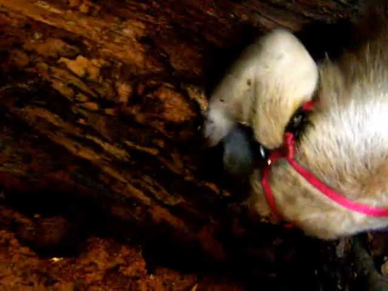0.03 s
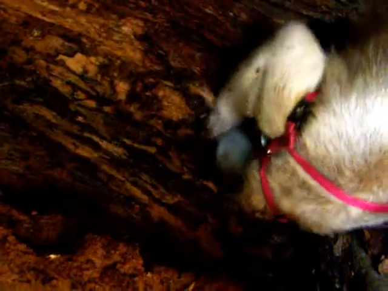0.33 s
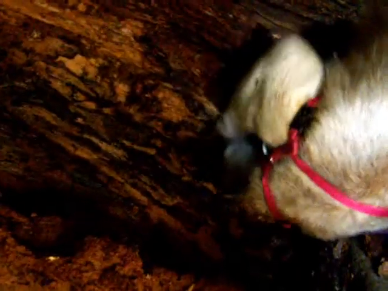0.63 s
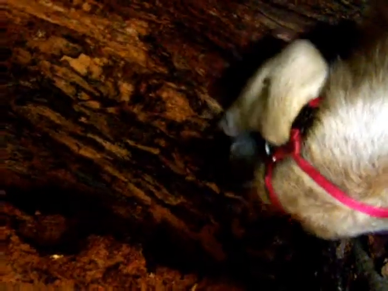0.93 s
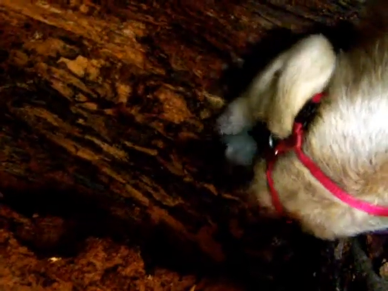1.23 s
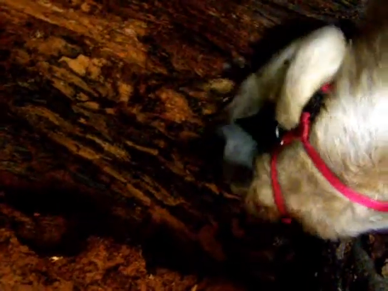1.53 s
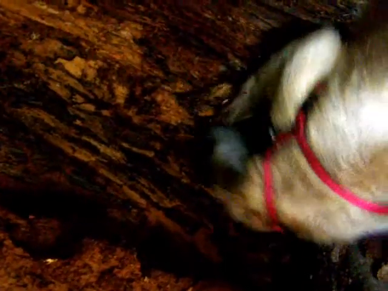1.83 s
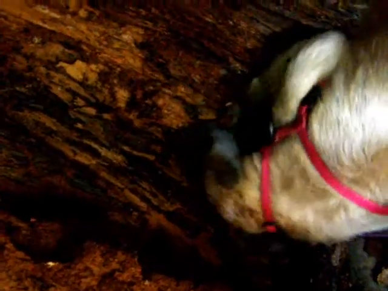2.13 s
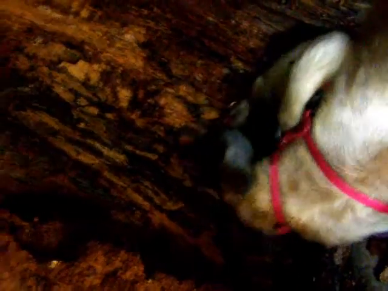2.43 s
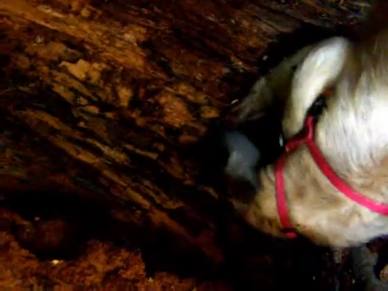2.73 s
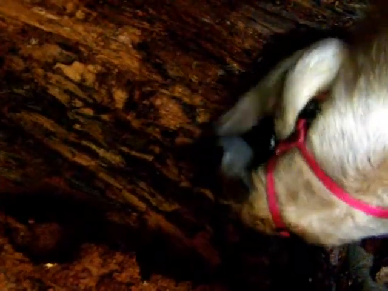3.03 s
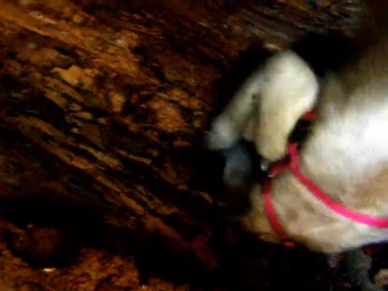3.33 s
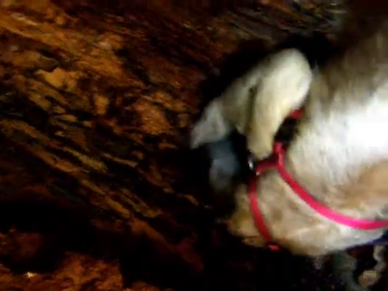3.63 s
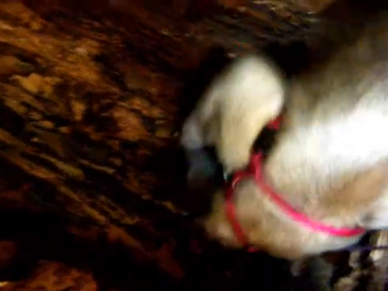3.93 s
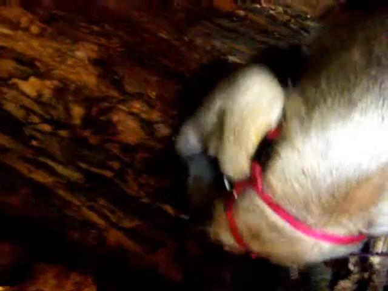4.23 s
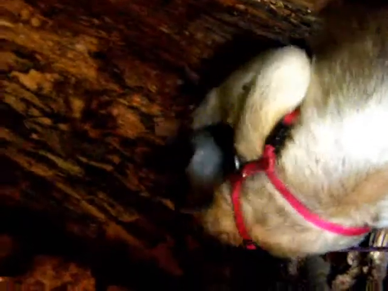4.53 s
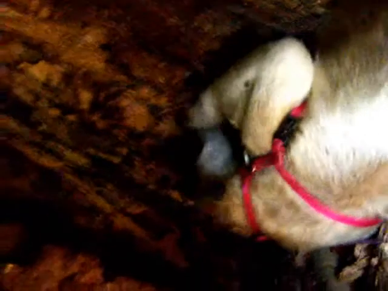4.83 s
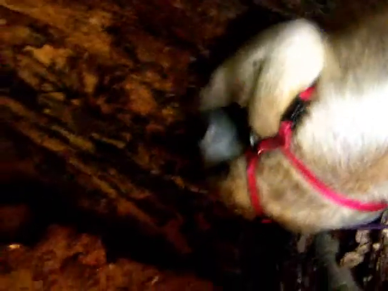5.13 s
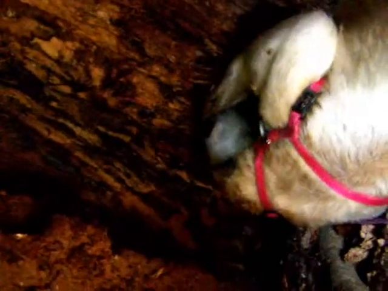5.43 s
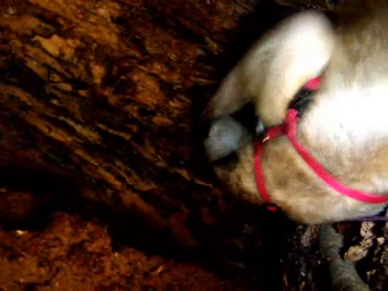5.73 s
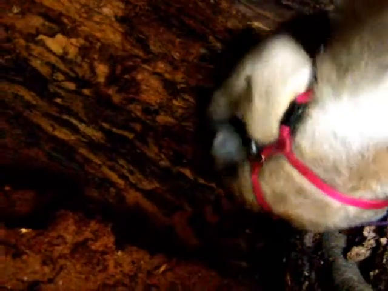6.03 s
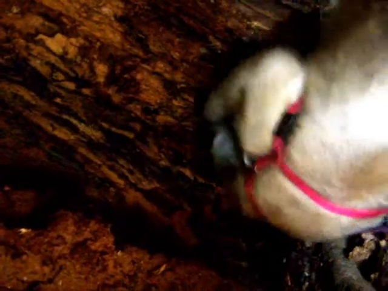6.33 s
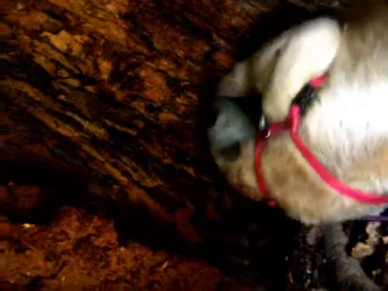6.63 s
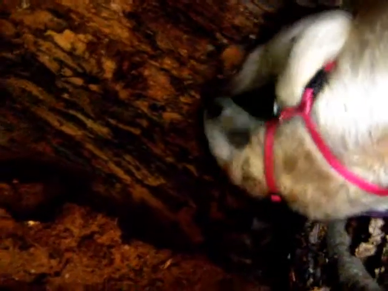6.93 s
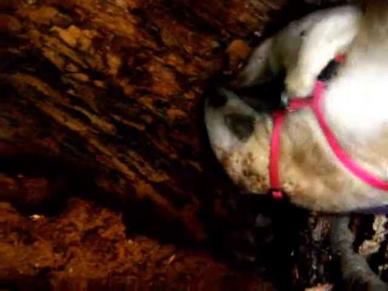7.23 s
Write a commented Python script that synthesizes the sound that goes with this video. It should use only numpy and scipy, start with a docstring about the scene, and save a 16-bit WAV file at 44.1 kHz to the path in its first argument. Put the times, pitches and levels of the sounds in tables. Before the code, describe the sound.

Over a steady, quiet outdoor hiss, a hand-held microphone picks up soft low thumps, a throbbing rumble and gritty little finger scratches. Close by, a goat rubs and nibbles the crumbling inside of a hollow tree. A high squeaky scrape sounds, the audio cuts out for a moment, and the scrape returns. Dry fibres tick and snap in clusters, the muzzle bumps the trunk dully, and the rubbing gradually turns crisper.

```python
"""A goat noses and nibbles at rotten wood inside a hollow tree, close to a hand-held camera's microphone.
Its muzzle rubs the crumbly wall and bumps the trunk, dry fibres snap, and one squeaky scrape is heard
again as an exact repeat. Fingers scratch on the camera; soft knocks set the microphone swaying with a
deep throb. Behind it all lies a quiet outdoor wash. Once the sound drops out briefly."""
import sys
import numpy as np
from scipy import signal
from scipy.fft import rfft, irfft
from scipy.io import wavfile
from scipy.ndimage import uniform_filter1d

SR = 44100
rng = np.random.default_rng(int(sys.argv[2]) if len(sys.argv) > 2 else 0)


def bounce(signal):
    """Save signal as a 16-bit WAV file at the path given by the first command-line argument."""
    frames = np.transpose(np.atleast_2d(signal))
    limited = np.clip(frames, -1, 1)
    pcm = np.round(limited * 32767).astype(np.int16)
    wavfile.write(sys.argv[1], SR, pcm)


N = 321930
TIME = np.arange(N) / SR
CUTOFF_HZ = 8740

# muzzle strokes on the inside wall: t/s, length/s, relative pressure/dB
MUZZLE_RUBS = [(.68, 0.75, -43), (1.223, 0.59, -38.5), (1.525, 0.3, -41.5), (2.215, 0.82, -44),
               (2.898, 0.21, -43.5), (3.763, 0.27, -41.5), (4.768, 0.15, -34.5), (4.845, 0.4, -39),
               (5.666, 0.7, -43), (6.843, 0.48, -43)]
# from damp, hollow wood over to dry, crumbly wood: t/s, dryness (0-1)
WOOD_DRYNESS = [(1.3, 0), (2.9, 0.2), (3.8, 0.73), (4.9, 0.5), (7, .97)]
# spectra of crumbling wood, its dry fizz and its damp grumble: f/Hz, level/dB
CRUMBLE_SPECTRUM = [(150, -30), (550, -10), (850, -22), (1650, -11), (2100, -9.5), (2800, -6.5), (3150, -5),
                    (3400, 4.5), (3650, 2.5), (4000, -6), (4400, -4.5), (4900, -23), (8500, -40.5)]
FIZZ_SPECTRUM = [(3000, -23.5), (4100, 0.5), (4650, 4), (4900, -1.5), (5350, 3), (6200, -7.5), (7600, -10),
                 (8500, -23.5)]
GRUMBLE_SPECTRUM = [(150, -12), (350, -8.5), (550, 7.5), (850, -12.5), (1600, -5), (2400, -13),
                    (4000, -43.5)]


def muzzle_rubbing(rise=0.2, splinter_db=-11, trickle_db=-60):
    """Close to the microphone, crumbs break under the muzzle: dry wood fizzes, damp wood grumbles."""
    pressure = sum(amp(db) * np.interp((TIME - start) / length, [0, rise, 1], [0, 1, 0])
                   for start, length, db in MUZZLE_RUBS)
    dryness = np.interp(TIME, *np.transpose(WOOD_DRYNESS))
    fizz_level = pressure * amp(-15.5 + 11.5 * dryness)
    grumble_level = pressure * amp(-7 - 10.5 * dryness)
    clumps = unit(amp(2 * wander(63)))
    body = colour(pressure * clumps * crumbs(per_s=5000, spread_db=2.5), CRUMBLE_SPECTRUM)
    fizz = colour(fizz_level * clumps * crumbs(per_s=2900, spread_db=1.5), FIZZ_SPECTRUM)
    grumble = colour(grumble_level * crumbs(per_s=1600, spread_db=2.5), GRUMBLE_SPECTRUM)
    splinters = colour(pressure * crumbs(per_s=41, spread_db=0), SCRATCH_SPECTRUM)
    trickle = colour(crumbs(per_s=220, spread_db=-1.5), FIZZ_SPECTRUM)  # runs on between rubs
    return body + fizz + grumble + amp(splinter_db) * splinters + amp(trickle_db) * trickle


# strokes of one squeaky scrape: t/s, length/s, level/dB, roughness (0-1), f/Hz
SQUEAK_STROKES = [(.874, 0.006, -25.5, 0.11, 3500), (.922, .017, -41, .7, 3000),
                  (0.936, 0.0068, -23, .02, 3470), (.94, .064, -33.5, .25, 3490),
                  (1, 0.027, -38.5, .5, 3400), (1.046, 0.057, -39, 0.87, 2860)]
# spectrum of its rasp: f/Hz, level/dB
RASP_SPECTRUM = [(1800, -30.5), (2500, 0.5), (2850, 8.5), (3150, -2), (3500, 18.5), (3850, -3), (4400, -32)]


def squeaky_scrape(repeat_after_s=1.5344):
    """One stick-slip scrape on hard wood, heard again as an exact repeat about 1.5 s later."""
    start, length, db, roughness, hz = np.transpose(SQUEAK_STROKES)
    stroke = np.maximum(np.searchsorted(start, TIME) - 1, 0)  # which one is sounding
    cycles = np.cumsum(hz[stroke] + 70 * wander(320)) / SR
    flutter_db = 8 * np.sqrt(roughness[stroke]) * np.tanh(wander(220))
    whistle = np.sqrt(2) * np.sin(2 * np.pi * cycles) * amp(flutter_db)
    whistle_level = strokes(zip(start, length, db + 10 * np.log10(1 - roughness)), taper=0.35)
    rasp_level = strokes(zip(start, length, db + 10 * np.log10(roughness)), taper=0.35)
    rasp = colour(rasp_level * rng.standard_normal(N), RASP_SPECTRUM)
    scrape = whistle_level * whistle + rasp
    return scrape + np.roll(scrape, round(repeat_after_s * SR))


# the loudest breaking fibres: t/s, relative level/dB, f/Hz, brightness/dB
FIBRE_SNAPS = [(0.424, -36, 2590, -22), (1.401, -32, 3420, -12), (1.5708, -25, 3630, -11),
               (1.579, -34, 3560, -2), (1.5863, -25.5, 3400, -13), (1.634, -28, 3540, -10),
               (2.08, -36, 3450, -4), (2.8466, -29, 3460, -11), (2.865, -32.5, 3400, -14),
               (2.9445, -31.5, 3720, -8), (2.9743, -31, 3570, -13), (3.039, -28, 3350, -13),
               (3.127, -33.5, 3450, -9), (3.1556, -37, 3550, -5), (3.64, -31.5, 3400, -11),
               (3.6662, -26.3, 3540, -19), (3.7908, -29.5, 3380, -11), (3.8894, -31.5, 3350, -10),
               (3.8977, -33, 3620, -8), (4.0567, -35, 3650, -5), (5.3322, -24, 4100, -20),
               (5.3341, -20.5, 3850, -9.5), (5.4324, -32, 3420, -10.5), (5.445, -33, 3700, -8),
               (6.036, -32.5, 3300, -13), (6.3213, -33, 2480, -17), (6.7113, -33.5, 2220, -23)]
# ring of the wood, shifted to each snap's pitch: f/Hz, level/dB
RING_SPECTRUM = [(500, -18), (1800, -15), (3050, -7.5), (3400, 1.5), (3800, -5), (4300, -16), (5500, -21.5),
                 (8500, -40.5)]


def fibre_snapping(gain_db=18, edge_db=-5, tear_s=0.0024):
    """A fibre breaks with one click, tears on briefly and rings the wood at its own pitch."""
    t, out = np.arange(SR // 30) / SR, np.zeros(N)
    tearing = amp(-17) * np.exp(-t / tear_s)
    f = np.geomspace(300, CUTOFF_HZ, 100)
    peak_hz = max(RING_SPECTRUM, key=lambda point: point[1])[0]
    for start, db, hz, bright_db in FIBRE_SNAPS:
        crack = (t == 0) + tearing * rng.standard_normal(len(t))
        ring_db = level_at(RING_SPECTRUM, f * peak_hz / hz)
        fizz_db = level_at(FIZZ_SPECTRUM, f) + bright_db + edge_db  # dry fibres break brighter
        spectrum = np.c_[f, np.maximum(ring_db, fizz_db)]
        add(out, start, amp(db + gain_db) * colour(crack, spectrum))
    return out


# dull bumps on the trunk: t/s, relative level/dB
MUZZLE_BUMPS = [(.873, -27.5), (1.012, -29.5), (2.408, -29), (2.546, -30), (2.944, -33), (3.039, -30.5),
                (3.126, -32.5)]
# the hollow trunk's response: f/Hz, level/dB
TRUNK_SPECTRUM = [(90, -22), (180, -6), (330, -2), (550, -2.5), (800, -17.5), (1500, -20.5), (3000, -49)]


def muzzle_bumping(gain_db=16, decay_s=0.01):
    """A soft blow and a brief shudder, dying quickly in the damp trunk."""
    t, out = np.arange(SR // 10) / SR, np.zeros(N)
    for start, db in MUZZLE_BUMPS:
        shudder = amp(-22) * rng.standard_normal(len(t)) * np.exp(-t / decay_s)
        add(out, start, amp(db + gain_db) * ((t == 0) + shudder))
    return colour(out, TRUNK_SPECTRUM)


# fingers on the camera: t/s, length/s, relative level/dB
HANDLING_SCRATCHES = [(1.685, 0.046, -42.5), (1.992, 0.019, -42), (2.85, 0.022, -43), (3.128, 0.026, -47),
                      (4.275, 0.026, -42.5), (4.505, .028, -45.5), (4.67, .032, -45), (5.362, 0.014, -38.5),
                      (6.28, 0.042, -41), (6.392, .037, -40.5), (6.508, 0.041, -40.5), (6.626, .072, -41),
                      (7.153, 0.039, -37)]
# spectrum of these scratches, also used for the wood's splinters: f/Hz, level/dB
SCRATCH_SPECTRUM = [(500, -10), (1600, -24), (2600, -1), (3050, -9.5), (3500, 5), (4200, -4.5),
                    (5300, -7.5), (6300, -15), (8500, -35)]


def handling_scratching(gain_db=5):
    """Fingers rub the camera in short, gritty scratches, many just before a knock."""
    grit = crumbs(per_s=3500, spread_db=2.5) * unit(amp(1.7 * wander(200)))
    return amp(gain_db) * colour(strokes(HANDLING_SCRATCHES, taper=0.64) * grit, SCRATCH_SPECTRUM)


# knocks on the camera, alone or in even runs: first t/s, count, gap/s, sway level/dB, thump level/dB
CAMERA_KNOCKS = [(0, 2, .048, -32, -27), (.17, 3, .1205, -26, -26.5), (.543, 2, .04, -25.5, -33),
                 (.788, 1, 0, -27.5, -35), (1.114, 1, 0, -27, -33.5), (1.673, 1, 0, -25, -22),
                 (1.884, 2, .115, -26.5, -26), (2.117, 2, .206, -27, -35), (2.647, 1, 0, -26.5, -32),
                 (2.959, 4, .135, -25, -26.5), (3.656, 1, 0, -27, -23), (3.831, 3, .112, -29, -27.5),
                 (4.178, 3, .112, -29.5, -27), (4.528, 1, 0, -27.5, -24.5), (5.146, 1, 0, -28, -23.5),
                 (5.401, 2, .128, -30.5, -37.5), (5.886, 2, .131, -32, -26), (6.189, 4, .114, -29.5, -26.5),
                 (6.905, 1, 0, -29.5, -24.5), (7.056, 3, .118, -30, -25.5)]
# modes of the microphone and of the case: f/Hz, level/dB, t60/s
SWAY_MODE = (26.56, 0, 1.2)
CASE_MODES = [(51.3, 5.5, 0.013), (74.4, -15, 0.17), (91.9, -13, 0.27)]


def camera_knocking(lowpass_hz=150):
    """Each knock thumps the case and leaves the microphone swaying; knocks in step build the sway up."""
    t, out = np.arange(2 * SR) / SR, np.zeros(N)
    sway, *case = [amp(db - 60 * t / t60) * np.sin(2 * np.pi * hz * t)
                   for hz, db, t60 in [SWAY_MODE] + CASE_MODES]
    for first, count, gap, sway_db, thump_db in CAMERA_KNOCKS:
        for start in first + gap * np.arange(count):
            add(out, start, amp(thump_db) * sum(case) - amp(sway_db) * sway)
    return signal.sosfiltfilt(signal.butter(2, lowpass_hz, fs=SR, output="sos"), out)


# outdoor ambience at the tree: f/Hz, level/dB
WASH_SPECTRUM = [(20, 0), (60, -1.5), (130, -5.5), (250, -6.5), (380, -0.5), (530, 3.5), (700, 0.5),
                 (850, -3), (1150, 0), (1550, -4.5), (2050, -4), (2300, -7.5), (3050, -7.5), (3550, -1.5),
                 (4000, -9.5), (4400, -10), (4900, -18), (5500, -21.5), (6300, -26), (7500, -28.5),
                 (8500, -39.5)]


def outdoor_wash(level_db=-40.5):
    """The steady background, coloured by the hollow and wavering by about 1 dB."""
    return amp(level_db + wander(30)) * colour(rng.standard_normal(N), WASH_SPECTRUM)


def amp(db):
    """Decibels to gain."""
    return 10 ** (np.asarray(db) / 20)


def unit(x):
    """Scales to an rms of 1."""
    return x / np.sqrt(np.mean(x ** 2) + 1e-20)


def add(mix, start_s, sound):
    """Mixes a sound in at the given time."""
    part = mix[round(start_s * SR):][:len(sound)]
    part += sound[:len(part)]


def level_at(spectrum, hz):
    """A spectrum's dB at the given frequencies."""
    f, db = np.transpose(spectrum)
    return np.interp(np.log(hz + 1), np.log(f), db)


def colour(x, spectrum):
    """Minimum-phase filter of unit energy with the given spectral shape."""
    hz = abs(np.fft.fftfreq(4096, 1 / SR))
    log_gain = np.log(amp(level_at(spectrum, hz)))
    response = np.exp(np.conj(signal.hilbert(log_gain)))
    taps = np.fft.ifft(response).real[:len(hz) // 2]
    return signal.fftconvolve(x, taps / np.linalg.norm(taps))[:len(x)]


def wander(rate_hz):
    """Smooth random drift of rms 1, moving up to about the given rate."""
    f = np.fft.rfftfreq(N, 1 / SR)
    return unit(irfft(rfft(rng.standard_normal(N)) * np.exp(-(f / rate_hz) ** 2), N))


def crumbs(per_s, spread_db):
    """A random train of tiny clicks; a positive spread makes a few stand out."""
    size = amp(spread_db * np.minimum(rng.exponential(1, N), 4))
    return unit(size * rng.choice([-1, 1], N) * (rng.random(N) < per_s / SR))


def strokes(rows, taper):
    """Envelope of short strokes given as t/s, length/s, level/dB."""
    level = np.zeros(N)
    for start, length, db in rows:
        add(level, start, amp(db) * signal.windows.tukey(round(length * SR), taper))
    return level


def scene():
    """One microphone at the hollow tree: the goat close up, handling noise, the outdoors behind."""
    goat = muzzle_rubbing() + squeaky_scrape() + fibre_snapping() + muzzle_bumping()
    return (goat + handling_scratching() + camera_knocking() + outdoor_wash())[None]


# the brief gap in the sound: start t/s, end t/s
DROPOUT_SPAN = (1.2415, 1.337)


def record(dry, surge_db=6, settle_s=0.048):
    """The sound drops out, comes back a little too loud and settles; the top treble is cut throughout."""
    stop, resume = DROPOUT_SPAN
    gate = uniform_filter1d(1. * ((TIME < stop) | (TIME > resume)), size=170)
    surge = amp(surge_db * (TIME > stop) * np.exp(-abs(TIME - resume) / settle_s))
    lowpass = signal.firwin(401, CUTOFF_HZ, window=("kaiser", 8), fs=SR)
    return signal.oaconvolve(dry * gate * surge, lowpass[None], "same")


dry = scene()
out = record(dry)
bounce(out)
```